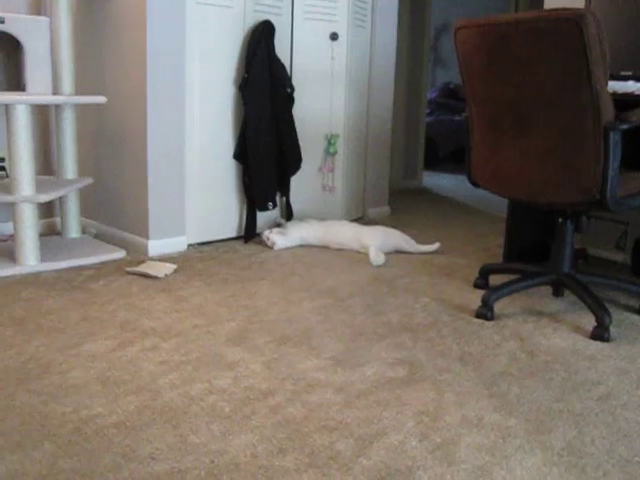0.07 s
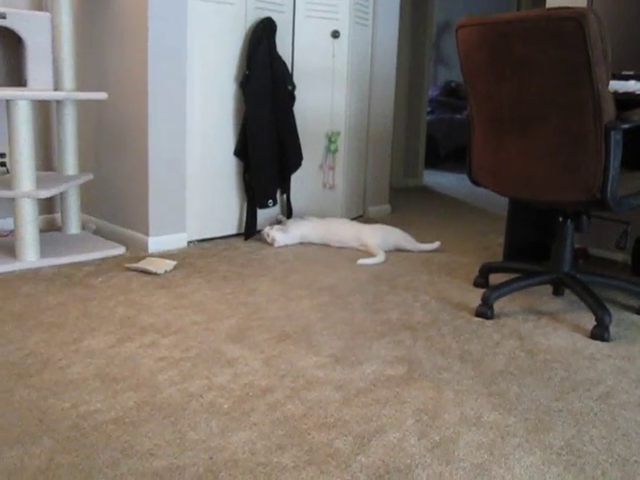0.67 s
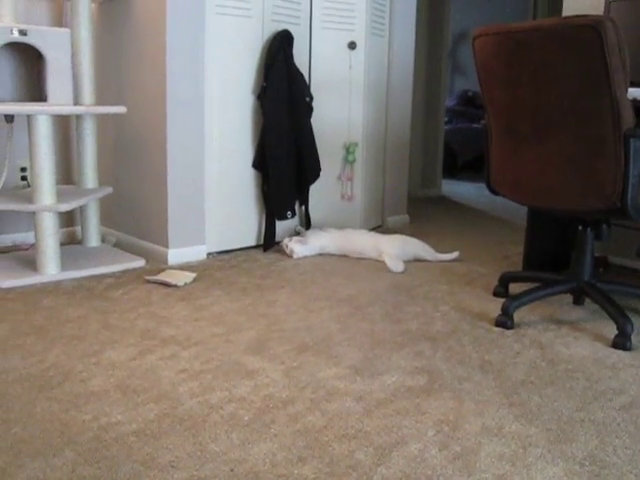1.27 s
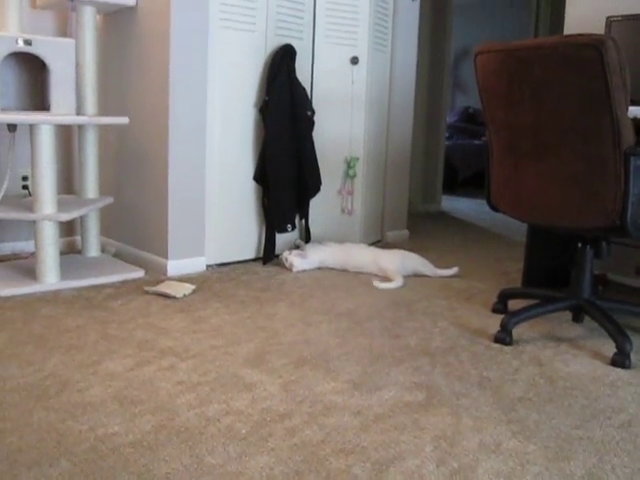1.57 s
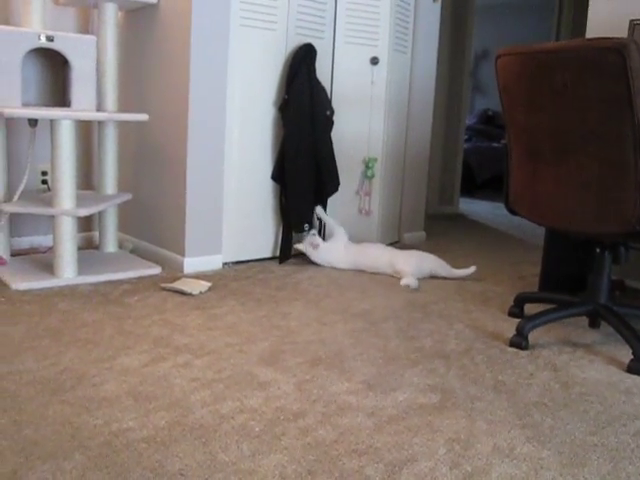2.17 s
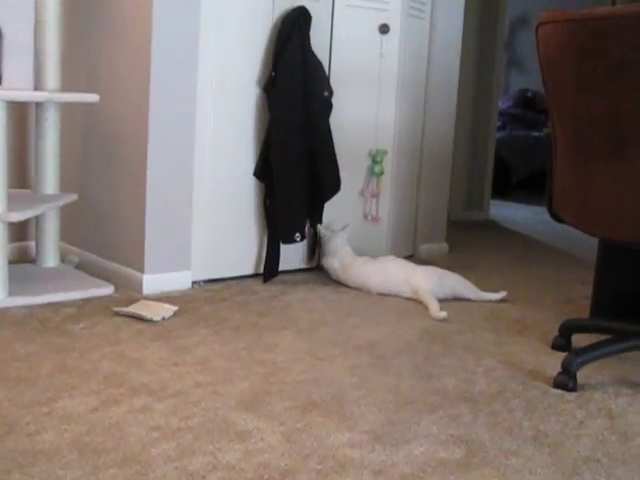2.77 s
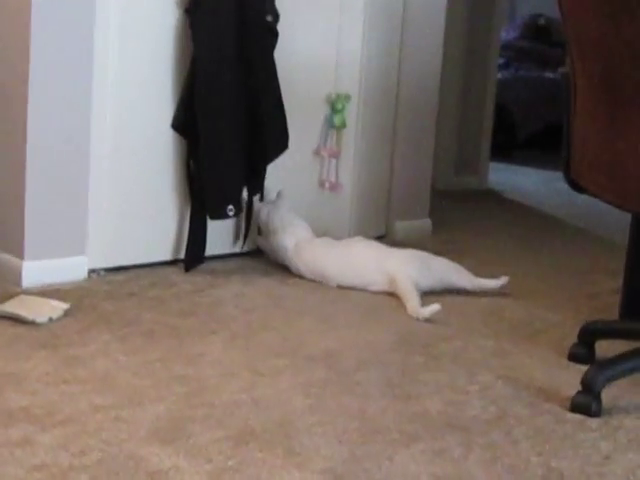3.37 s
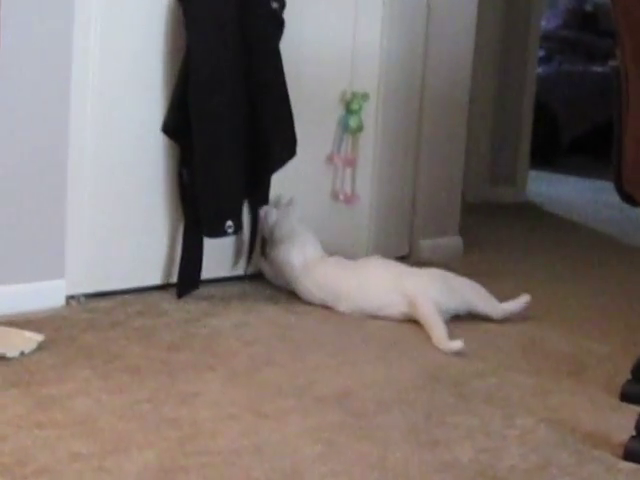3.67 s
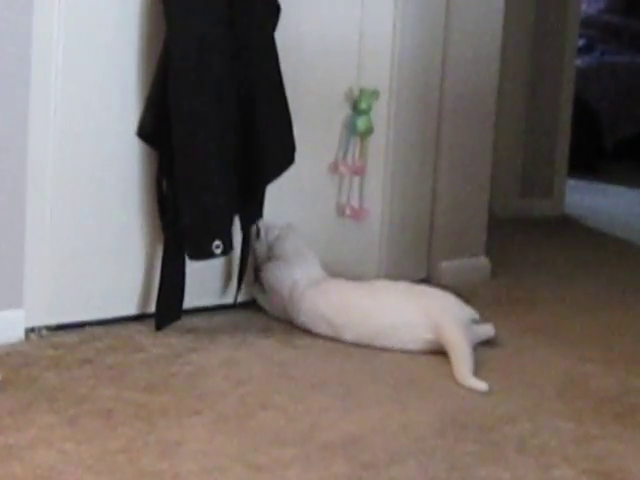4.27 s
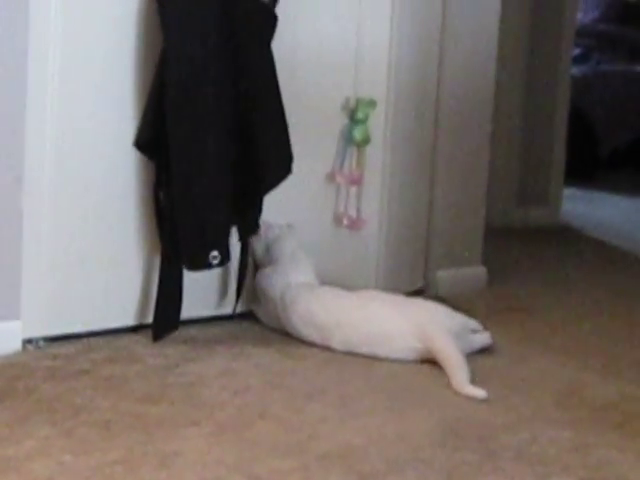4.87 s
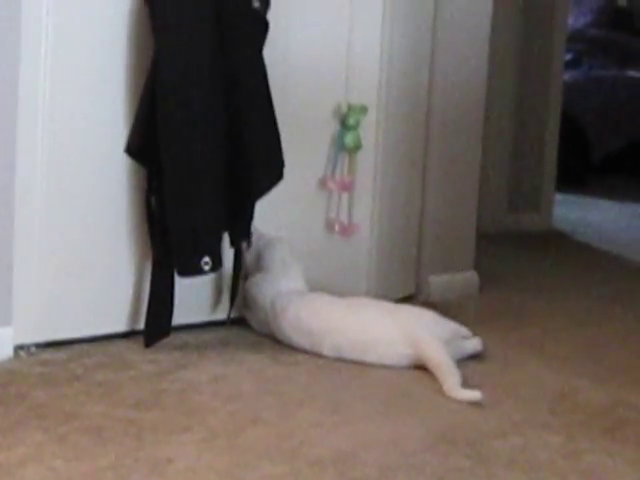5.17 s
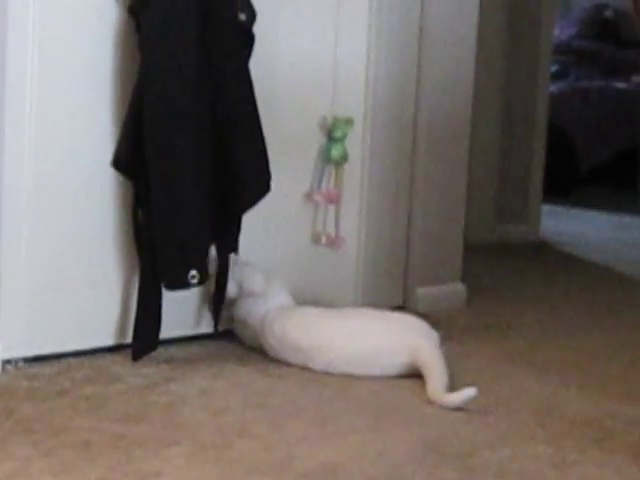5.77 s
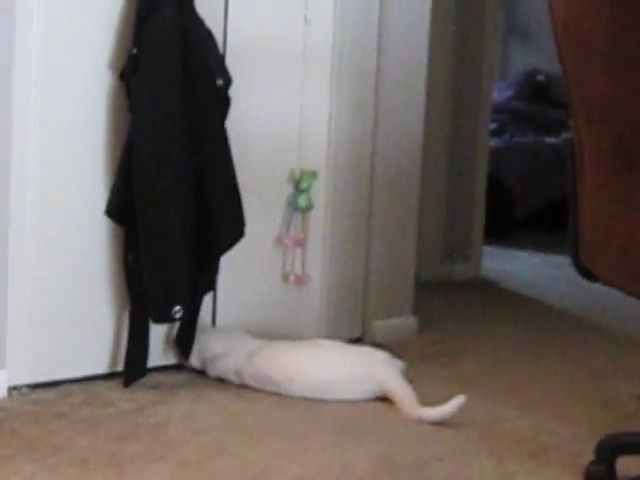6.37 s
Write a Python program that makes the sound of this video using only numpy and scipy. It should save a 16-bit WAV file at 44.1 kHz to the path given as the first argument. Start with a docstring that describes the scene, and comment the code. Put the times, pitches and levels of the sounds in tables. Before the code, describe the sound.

Close, dry finger rubs and clicks on a camera open over steady ventilation hum in a carpeted room. Across the room a cat scratches a painted closet door, sparsely at first, then in a quick run. The loose door knocks and rattles a couple of times and a small metal fitting jingles. A loud plastic snap at the microphone briefly dips the background, followed by another click and faint scratches.

```python
"""A hand-held camera clicks and rubs close by, over the hum of a fan in a quiet room.
A few metres away a cat lies on the carpet and claws at a folding closet door: tiny slips rasp on the
paint and shake the panel, the door bumps and chatters in its track, and a small metal fitting jingles.
The door sounds through the room, while the camera's own noises stay dry.
Gain control ducks everything after the loudest click, then creeps back."""
import sys
import numpy as np
from scipy import signal
from scipy.fft import rfft, irfft
from scipy.io import wavfile

SR = 44100
rng = np.random.default_rng(int(sys.argv[2]) if len(sys.argv) > 2 else 0)


def transcribe(u):
    """Save the signal u as a 16-bit wav file named by the first command-line argument.

    u: samples, shape (n,) or (channels, n), limited to [-1, 1]; the rate is SR.
    q: integer samples, one column per channel.
    """
    v = np.clip(np.atleast_2d(u).T, -1, 1)
    q = np.round(v * 32767).astype(np.int16)
    wavfile.write(sys.argv[1], SR, q)


N = 291501
TIME = np.arange(N) / SR

# colour of the ventilation noise: (frequency [Hz], relative level [dB])
AIR_COLOUR = [(12, 1.5), (29, 16), (42, 2), (100, 2.5), (300, -3.5), (500, -9), (1250, -7.5), (1580, -12.5),
              (1850, -12.5), (2450, -19), (4000, -22), (5200, -25.5), (9500, -29.5), (16000, -39)]
# its fader, a little lower at first: (time [s], level [dB])
AIR_FADER = [(0, -49), (0.55, -51), (1.25, -48), (3.3, -46.5)]
# tones of the fan: (frequency [Hz], level [dB])
FAN_HUM = [(59.5, -63), (91.5, -70.5), (120, -71), (360, -62), (425.3, -67.5), (592.2, -66.5)]

# fingers rubbing the case: (time [s], length [s], level [dB])
FINGER_RUBS = [(0.166, 0.093, -40), (0.274, 0.043, -39.5)]
# colour of skin on plastic: (frequency [Hz], relative level [dB])
SKIN_COLOUR = [(500, -16), (800, 2), (1100, -13), (1700, -3), (2400, -6.5), (3400, -3.5), (4350, 3),
               (5400, -8), (8500, -14), (12000, -22.5), (16000, -35)]
# a hollow knock on the grip: (time [s], peak [dB], low edge [Hz], high edge [Hz])
GRIP_KNOCK = [(0.2817, -12, 320, 11800)]
# modes of the grip: (frequency [Hz], level [dB], t60 [s])
GRIP_MODES = [(760, 3, 0.03), (830, -4, 0.077), (1653, 3.5, 0.013), (2920, 4, 0.0014), (6100, -1, 0.0023)]
# a light ping of the strap ring: (time [s], peak [dB], low edge [Hz], high edge [Hz])
STRAP_PING = [(1.2278, -23.5, 900, 15000)]
# modes of the strap ring: (frequency [Hz], level [dB], t60 [s])
STRAP_MODES = [(2110, 13, 0.0034), (2945, 7, 0.059), (3480, 6, 0.021), (4990, 14, 0.0033),
               (7000, 1.1, 0.012), (10950, 3.2, 0.0082)]
# case clicks: (time [s], snap peak [dB], band centre [Hz], tick relative to snap [dB], longest t60 [s])
CASE_CLICKS = [(0.055, -29.5, 1160, -28, .02), (0.338, -30, 2100, -6, .01), (0.431, -34.5, 3500, -3, .01),
               (2.486, -35.5, 2600, -20, .015), (3.4662, -11.5, 860, -9.5, 0.028),
               (5.4688, 1, 2370, -10, 0.048), (5.4992, -31.5, 1490, -12, .01),
               (5.521, -35.5, 208, -25, .02), (5.894, -39.5, 1490, -17, .01), (6.1664, -9, 3000, -26, .011)]
# modes of the camera case: (frequency [Hz], level [dB], t60 [s])
CASE_MODES = [(405, -7, 0.013), (814, -11, 0.064), (1145, 2.5, 0.005), (1890, 3, 0.0098), (2420, -8, 0.037),
              (3110, 7, 0.0053), (3650, 2, 0.008), (4200, -9.5, 0.0081), (6100, -7.5, 0.0047),
              (7370, -15, 0.0088), (8500, -19.5, 0.012), (14700, -7, 0.0028)]

# reverb tail of the room: (frequency [Hz], t60 [s])
ROOM_DECAY = [(60, 0.61), (300, 0.83), (800, 0.38), (3000, 0.27), (6000, 0.17), (14000, 0.5)]
# shakes of the metal fitting: (time [s], level [dB], contact brightness [Hz])
FITTING_SHAKES = [(0.078, -19, 8800), (3.473, -11.5, 9000), (3.936, -14.5, 8800), (4.4898, -9.5, 5730)]
# modes of the fitting: (frequency [Hz], level [dB], t60 [s])
FITTING_MODES = [(2720, -2, .014), (2950, -5, .02), (3090, 0, .03), (3270, -4, .022), (3660, -4, .022),
                 (4950, -7, .008), (5760, -6, .008), (6450, -5, .009), (8820, -9, .011)]
# the door bumping in its track: (time [s], chatter level [dB], chatter decay [s], boom level [dB])
DOOR_BUMPS = [(3.465, -36.5, 0.025, -42), (3.52, -41.5, 0.05, -50), (4.493, -33.5, 0.053, -50),
              (4.66, -46.5, 0.055, -35)]
# modes of the door panel: (frequency [Hz], level [dB], t60 [s])
PANEL_MODES = [(66.6, -17, 0.1), (117, -19, 0.12), (267, -15, 0.036), (356, -17, .025), (616, -9, 0.042),
               (710, -5, 0.027), (878, 0.5, .027), (1037, 0.5, 0.015), (1290, 2.5, .014), (1740, 2, 0.011),
               (2640, -6, 0.014)]
# claw strokes: (time [s], slide [s], rasp level [dB], panel push relative to rasp [dB], speed [x usual])
CLAW_STROKES = [(0.287, 0.031, -41.5, -7.5, 0.98), (0.335, 0.054, -49.5, -19, 1.27),
                (0.521, 0.028, -50.5, -4, 0.93), (0.653, 0.021, -49.5, -10, .8),
                (1.66, 0.14, -54.5, 0.5, 0.97), (2.582, 0.12, -38.5, -9, 0.75),
                (2.76, 0.084, -50.5, -1, 0.74), (2.838, 0.08, -41, -15, 0.85),
                (2.903, 0.095, -41, -4, 0.86), (3.145, 0.13, -40.5, -7, 0.87), (3.27, 0.16, -44, -1, 0.91),
                (3.4435, 0.037, -29.5, -3, 0.92), (3.62, .12, -53, 1.5, 0.85), (4.289, 0.15, -45.5, -20, 1),
                (4.44, 0.066, -45.5, -25, 1), (4.485, 0.086, -35, -0.5, .95), (5.99, 0.2, -53, -2.5, 1.14),
                (6.402, 0.086, -51, -24, .95)]
# colour of claws on paint: (frequency [Hz], relative level [dB])
RASP_COLOUR = [(600, -23), (1500, 0), (2200, 0), (2950, 2), (3500, 2.5), (4400, -3), (6000, -10.5),
               (7500, -18), (10000, -22.5), (16000, -37)]

# peaks and dips of the microphone port: (frequency [Hz], gain [dB], width [octaves])
MIC_EQ = [(1200, 0.5, 0.039), (1580, -3, 0.11), (1745, 1, 0.043), (2500, -3, 0.093), (9600, 0, 0.33)]


def from_db(db):
    """Decibels to gain."""
    return 10 ** (np.asarray(db) / 20)


def rms_one(x):
    """Scale to rms 1."""
    return x / np.sqrt(np.mean(x ** 2) + 1e-20)


def energy_one(x):
    """Scale a response so that it passes white noise at equal power."""
    return x / np.sqrt(np.sum(x ** 2) + 1e-20)


def at_hz(points, hz):
    """Read a table on a log-frequency axis."""
    table_hz, values = np.transpose(points)
    return np.interp(np.log(np.maximum(hz, 1)), np.log(table_hz), values)


def coloured(x, spectrum, speed=1):
    """Colour a white signal, keeping its power; faster sliding shifts the spectrum up."""
    gain = from_db(at_hz(spectrum, np.fft.rfftfreq(len(x), 1 / SR) / speed))
    return irfft(rfft(x) * rms_one(gain), len(x))


def cut(x, hz, kind):
    """Second-order low- or high-pass."""
    return signal.sosfilt(signal.butter(2, min(hz, SR / 2 - 1000), kind, fs=SR, output="sos"), x)


def band(x, low_hz, high_hz):
    """Steep band-pass: both edges applied twice."""
    for _ in range(2):
        x = cut(cut(x, low_hz, "high"), high_hz, "low")
    return x


def add(track, start_s, sound):
    """Mix a sound in at its cue."""
    i = max(round(start_s * SR), 0)
    track[i:i + len(sound)] += sound[:N - i]


def ring(modes):
    """Damped sines of a struck body."""
    t = TIME[:SR // 4]
    return sum(from_db(db - 60 * t / t60) * np.sin(2 * np.pi * hz * t) for hz, db, t60 in modes)


def grains(per_s, spread_db, size):
    """Tiny slips or contacts at random moments and of uneven strength; rms 1."""
    strengths = from_db(spread_db * np.minimum(rng.exponential(1, size), 4)) * rng.standard_normal(size)
    return rms_one(strengths * (rng.random(size) < per_s / SR))


def ventilation(waver_rad=0.16):
    """A soft bed of moving air with a slightly wavering fan hum."""
    fader = from_db(np.interp(TIME, *np.transpose(AIR_FADER)))
    bed = fader * rms_one(coloured(rng.standard_normal(N), AIR_COLOUR))
    for hz, db in FAN_HUM:
        wander = rms_one(cut(rng.standard_normal(N), 3.1, "low"))
        bed += np.sqrt(2) * from_db(db) * np.sin(2 * np.pi * hz * TIME + waver_rad * wander)
    return bed


def finger_rubs():
    """Skin slides over plastic in short, smooth swells."""
    swells = sum(from_db(db) * np.sin(np.pi * np.clip((TIME - start_s) / length_s, 0, 1)) ** 2
                 for start_s, length_s, db in FINGER_RUBS)
    return swells * coloured(grains(per_s=20000, spread_db=0.8, size=N), SKIN_COLOUR)


def snaps(hits, modes, bend_hz=2400, bend_width_hz=3000):
    """Dry snaps right at the microphone; each contact excites its own range of modes."""
    out = np.zeros(N)
    _, poles = signal.iirpeak(bend_hz, bend_hz / bend_width_hz, fs=SR)
    # all-pass: bending waves disperse, so the snap builds over a cycle or two
    body = signal.lfilter(poles[::-1], poles, ring(modes))
    for start_s, peak_db, low_hz, high_hz in hits:
        snap = band(body, low_hz, high_hz)
        add(out, start_s, from_db(peak_db) * snap / np.abs(snap).max())
    return out


def case_clicks(spread=2.25, tick_band_hz=(4380, 14100), thud_band_hz=(142, 415), thud_db=-30):
    """The case snaps, a bright tick on top and a faint thud below; a resting finger damps the ring."""
    out = np.zeros(N)
    for start_s, peak_db, centre_hz, tick_db, longest_s in CASE_CLICKS:
        damped_modes = [(hz, db, min(t60, longest_s)) for hz, db, t60 in CASE_MODES]
        snap = (start_s, peak_db, centre_hz / spread, centre_hz * spread)
        tick = (start_s, peak_db + tick_db, *tick_band_hz)
        thud = (start_s, peak_db + thud_db, *thud_band_hz)
        out += snaps([snap, tick, thud], damped_modes)
    return out


def room(x, early_db=-8.5, early_decay_s=0.0026, early_per_s=1500):
    """Direct sound, early reflections and a tail as strong as the direct sound, longest in the lows."""
    t, tail = TIME[:SR * 3 // 4], 0
    edges_hz = np.geomspace(30, 17000, 13)
    for low, high in zip(edges_hz, edges_hz[1:]):
        band_pass = signal.butter(2, [low, high], "band", fs=SR, output="sos")
        t60 = at_hz(ROOM_DECAY, np.sqrt(low * high))
        tail += signal.sosfilt(band_pass, rng.standard_normal(len(t))) * from_db(-60 * t / t60)
    reflections = rng.standard_normal(len(t)) * (rng.random(len(t)) < early_per_s / SR)
    early = reflections * np.exp(-t / early_decay_s)
    response = energy_one(tail) + from_db(early_db) * energy_one(early)
    response[0] += 1  # direct sound
    return signal.fftconvolve(x, energy_one(response))[:N]


def fitting_jingles(bounce_s=0.007, bounce_db=3.5):
    """The shaken fitting strikes twice, louder on the bounce; a softer contact dulls the high modes."""
    out, body = np.zeros(N), ring(FITTING_MODES)
    for start_s, db, contact_hz in FITTING_SHAKES:
        strike = energy_one(cut(body, contact_hz, "low"))
        add(out, start_s, from_db(db) * strike)
        add(out, start_s + bounce_s, from_db(db + bounce_db) * strike)
    return out


def panel_rattle(rise_s, decay_s, contact_hz):
    """A flurry of contacts swells and dies away, ringing the panel."""
    t = TIME[:SR // 2]
    force = np.minimum(t / rise_s, 1) * np.exp(-np.maximum(t - rise_s, 0) / decay_s)
    contacts = force * grains(per_s=3300, spread_db=0.9, size=len(t))
    panel = energy_one(cut(ring(PANEL_MODES), contact_hz, "low"))
    return signal.fftconvolve(contacts, panel)


def door_bumps(usual_contact_hz=1190, usual_decay_s=0.031):
    """Each bump sets the loose door chattering in its track while the whole leaf booms."""
    out = np.zeros(N)
    for start_s, chatter_db, decay_s, boom_db in DOOR_BUMPS:
        contact_hz = usual_contact_hz * np.sqrt(usual_decay_s / decay_s)  # shorter is harder, brighter
        chatter = panel_rattle(rise_s=0.013, decay_s=decay_s, contact_hz=contact_hz)
        boom = panel_rattle(rise_s=0.0071, decay_s=0.018, contact_hz=134)
        add(out, start_s, from_db(chatter_db) * chatter + from_db(boom_db) * boom)
    return out


def claw_strokes(usual_db=-43.5, bite_share=0.074, bite_power=0.82, fade_db=22.5, release_s=0.025):
    """Claws bite and slip down the door: they rasp, and the same slips shake the panel."""
    out, t = np.zeros(N), TIME[:SR // 2]
    panel = energy_one(ring(PANEL_MODES))
    for start_s, slide_s, rasp_db, push_db, speed in CLAW_STROKES:
        # strong strokes bite sooner
        bite_s = bite_share * slide_s * from_db(usual_db - rasp_db) ** bite_power
        pressure = np.interp(t, np.cumsum([0, bite_s, slide_s, release_s]), [0, 1, from_db(-fade_db), 0])
        slips = pressure * grains(per_s=6000, spread_db=1.5, size=len(t))
        add(out, start_s, from_db(rasp_db) * coloured(slips, RASP_COLOUR, speed)[:SR // 3])
        add(out, start_s, from_db(rasp_db + push_db) * signal.fftconvolve(slips, panel))
    return out


def scene():
    """Mono mix: the door across the room, dry handling noise up front and the air underneath."""
    door = claw_strokes() + door_bumps() + fitting_jingles()
    handling = case_clicks() + snaps(GRIP_KNOCK, GRIP_MODES) + snaps(STRAP_PING, STRAP_MODES)
    handling += finger_rubs()
    return (room(door) + handling + ventilation())[None]


def microphone(x):
    """The microphone port adds small, narrow peaks and dips."""
    for hz, db, octaves in MIC_EQ:
        b, a = signal.iirpeak(hz, 1 / (octaves * np.log(2)), fs=SR)
        x = x + (from_db(db) - 1) * signal.lfilter(b, a, x)
    return x


def gain_control(x, threshold_db=-6.5, release_db_per_s=14.5, attack_s=0.031):
    """A peak over the threshold ducks the gain; it creeps back afterwards."""
    over_db = np.maximum(20 * np.log10(np.abs(x) + 1e-9) - threshold_db, 0)
    release_db = release_db_per_s * TIME
    held_db = np.maximum.accumulate(over_db + release_db, axis=-1) - release_db
    pole = np.exp(-1 / (attack_s * SR))
    duck_db = signal.lfilter([1 - pole], [1, -pole], held_db)
    return x * from_db(-duck_db)


def record(dry, start_s=0.036, cutoff_hz=15900):
    """The camera colours the sound, rides the gain, opens after an instant and cuts the top."""
    x = gain_control(microphone(dry)) * (TIME > start_s)
    return signal.sosfilt(signal.ellip(10, 0.1, 70, cutoff_hz, fs=SR, output="sos"), x)


dry = scene()
out = record(dry)
transcribe(out)
```